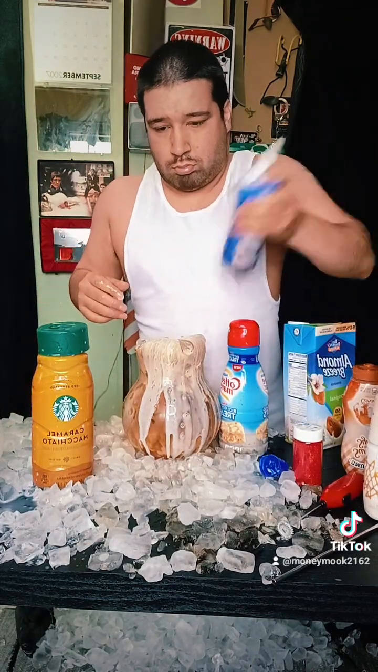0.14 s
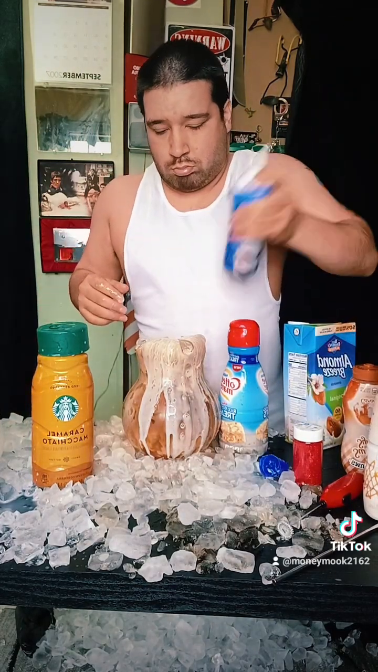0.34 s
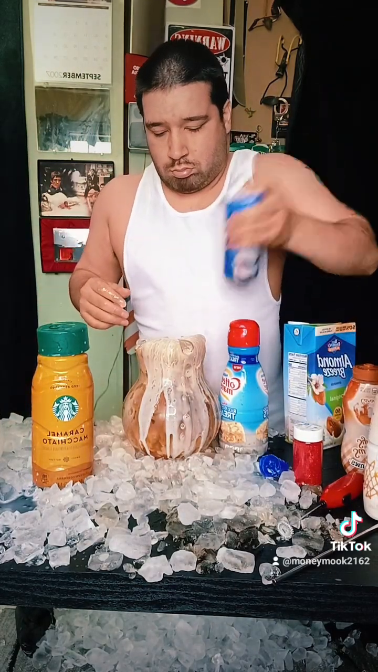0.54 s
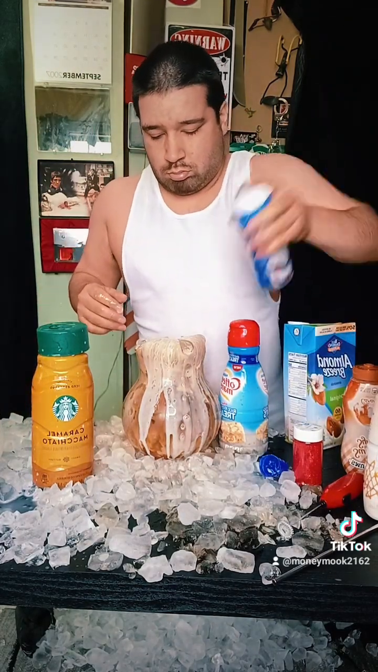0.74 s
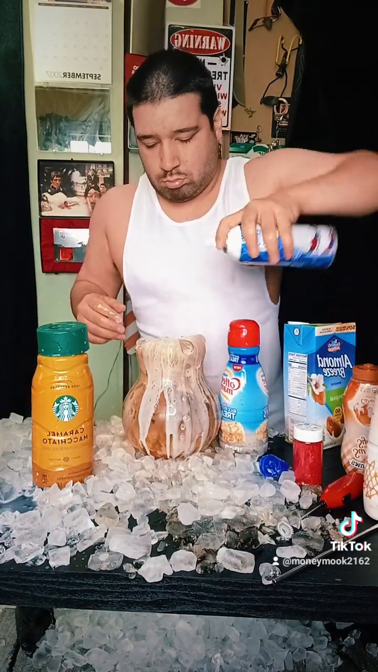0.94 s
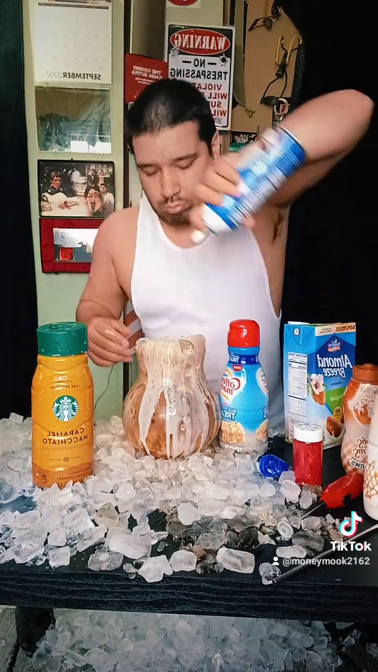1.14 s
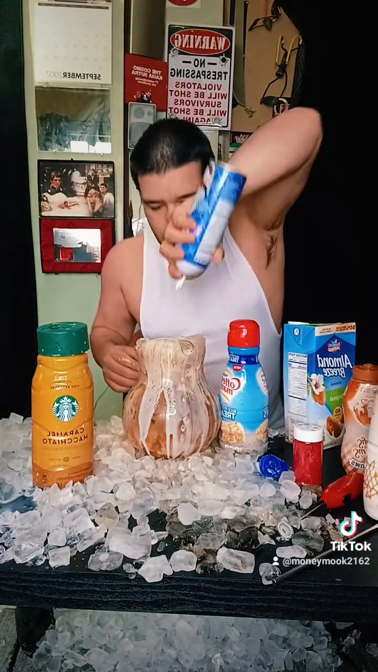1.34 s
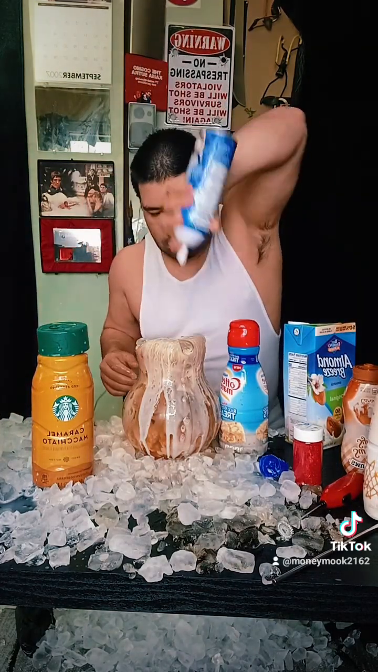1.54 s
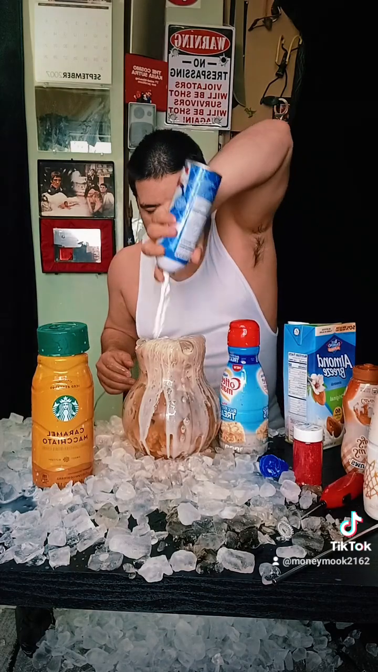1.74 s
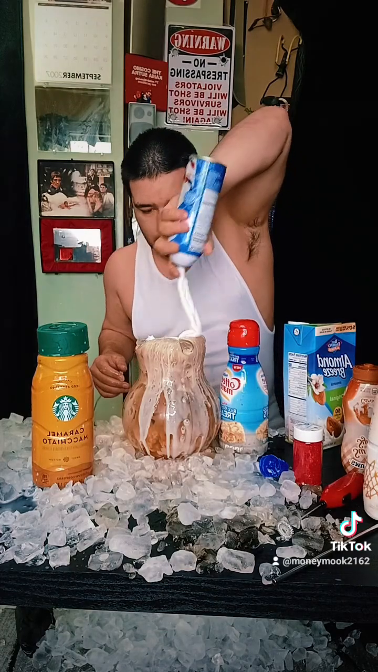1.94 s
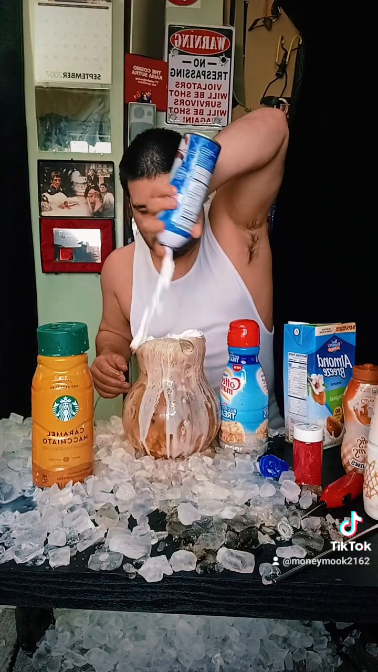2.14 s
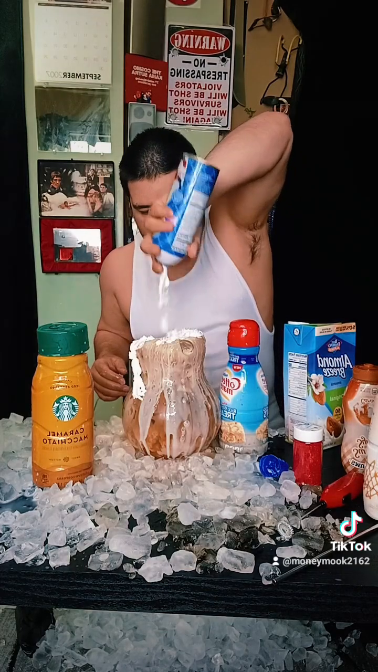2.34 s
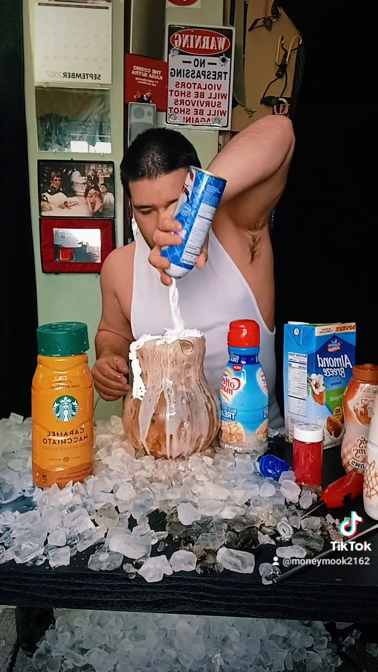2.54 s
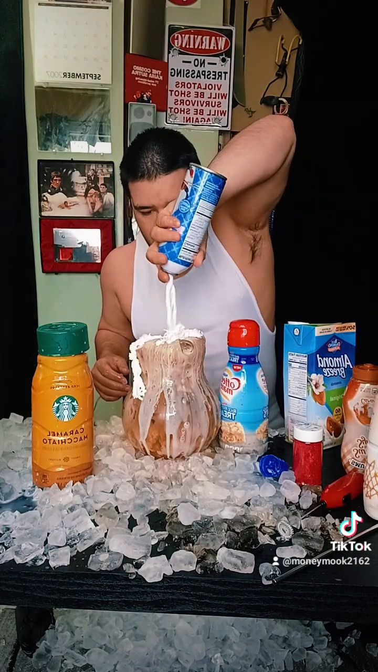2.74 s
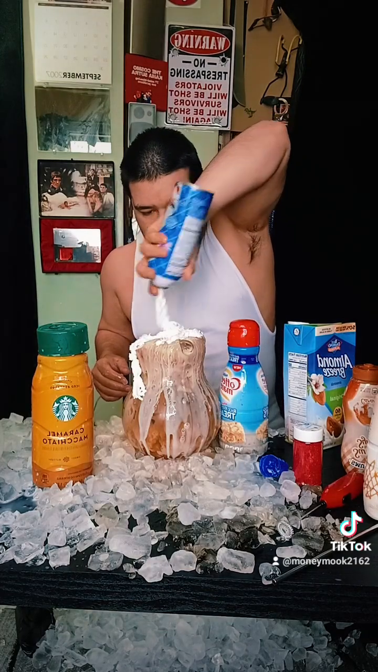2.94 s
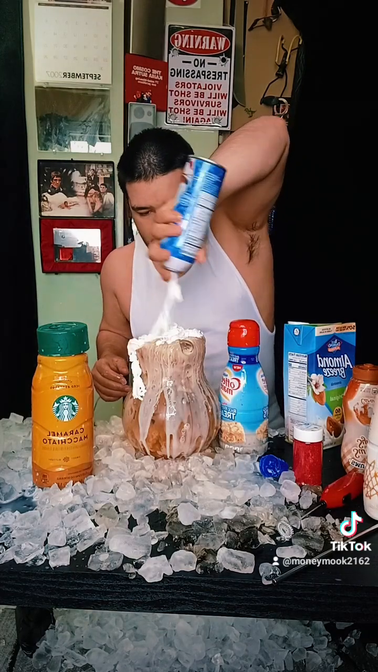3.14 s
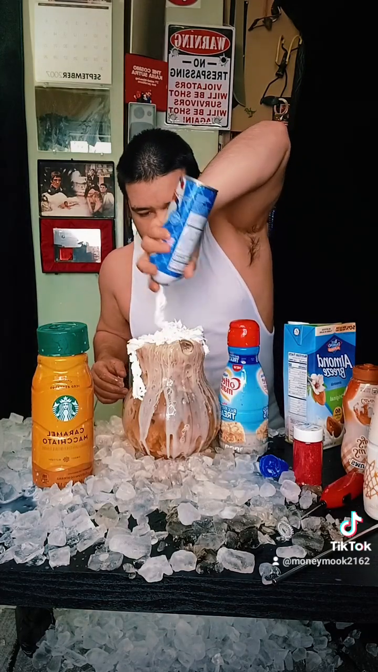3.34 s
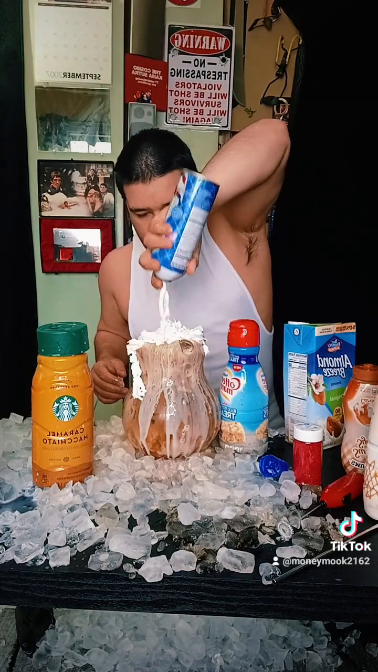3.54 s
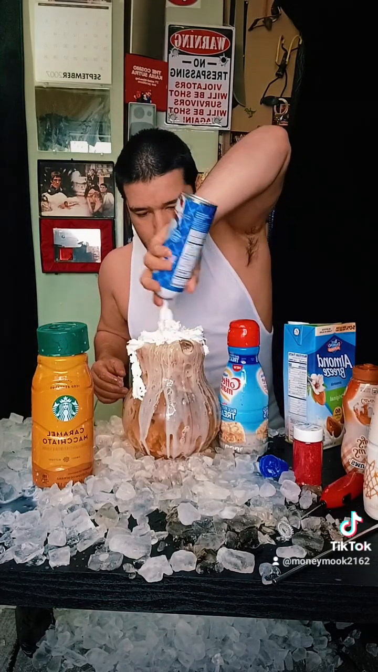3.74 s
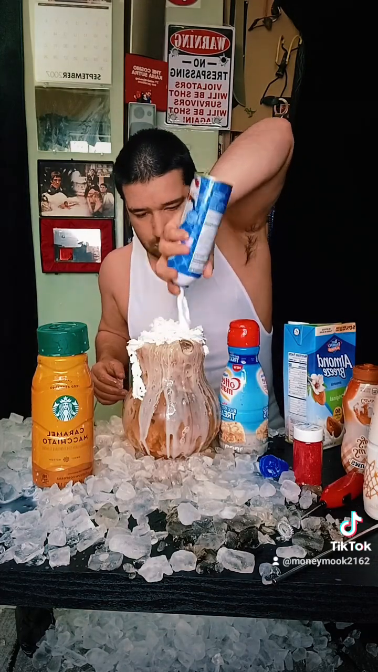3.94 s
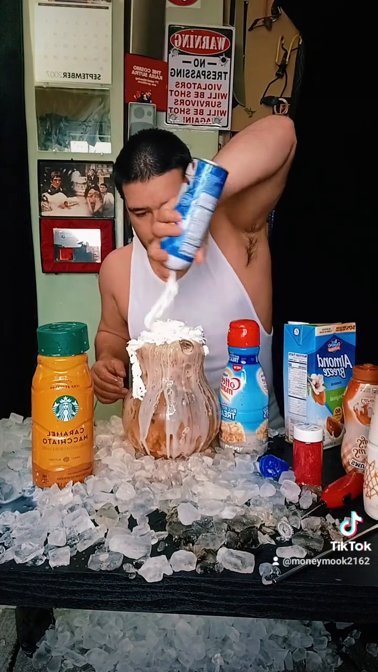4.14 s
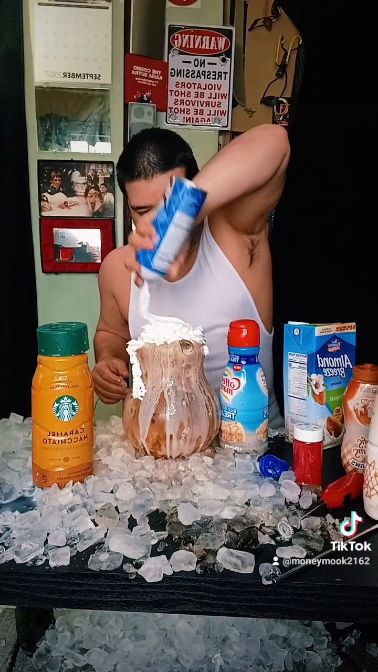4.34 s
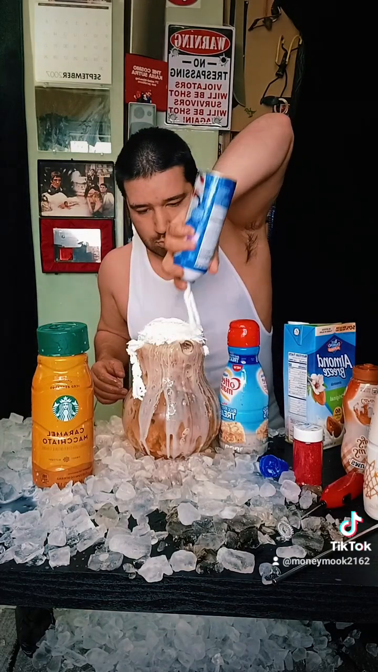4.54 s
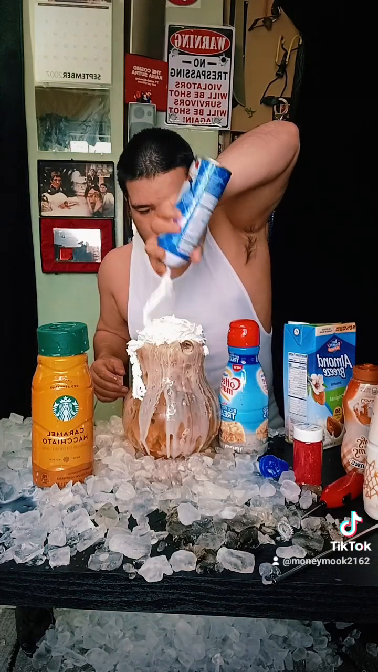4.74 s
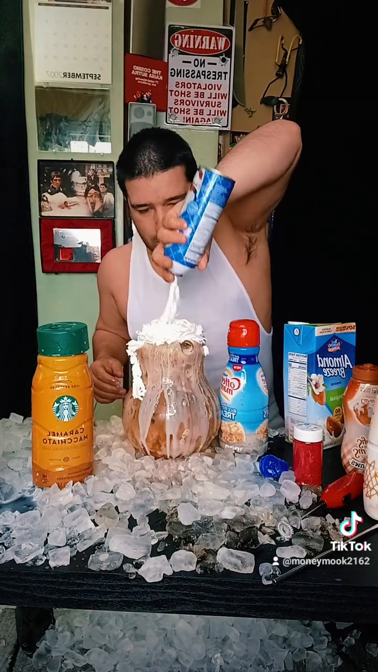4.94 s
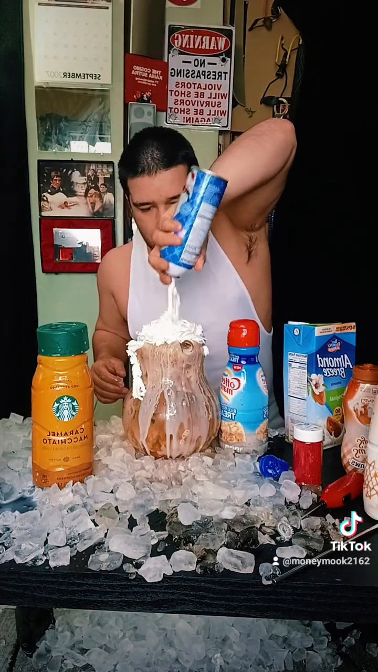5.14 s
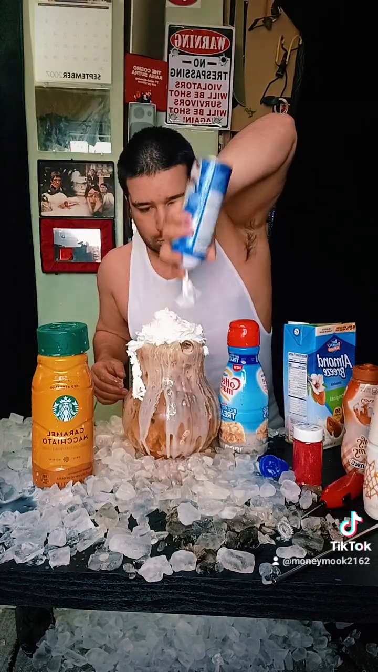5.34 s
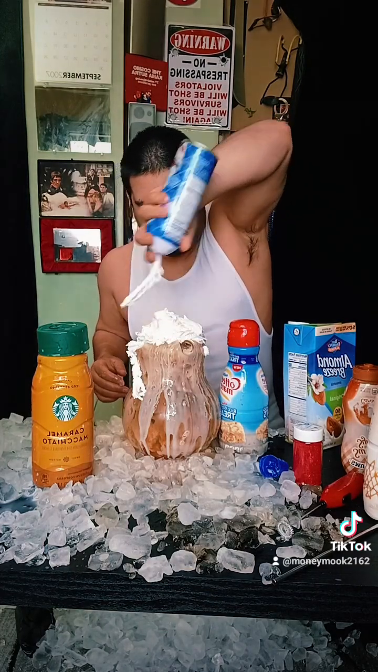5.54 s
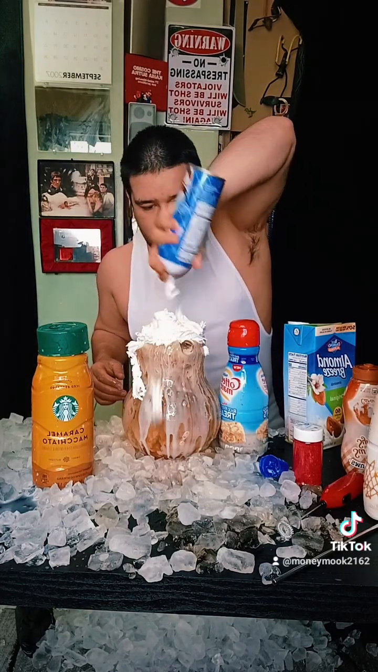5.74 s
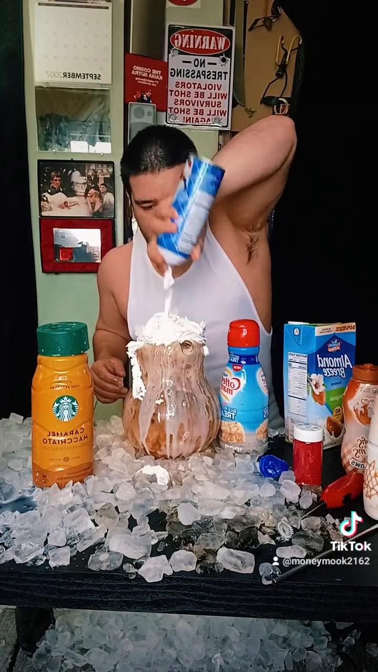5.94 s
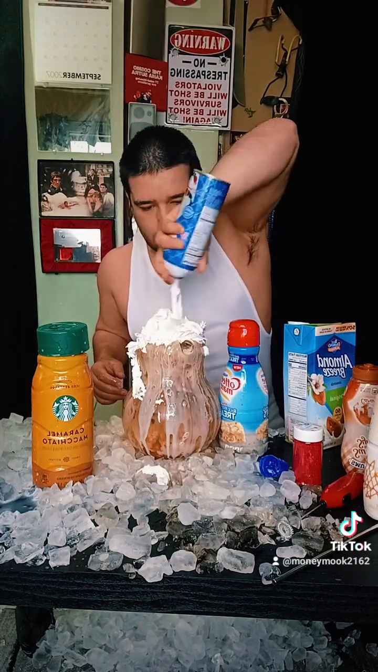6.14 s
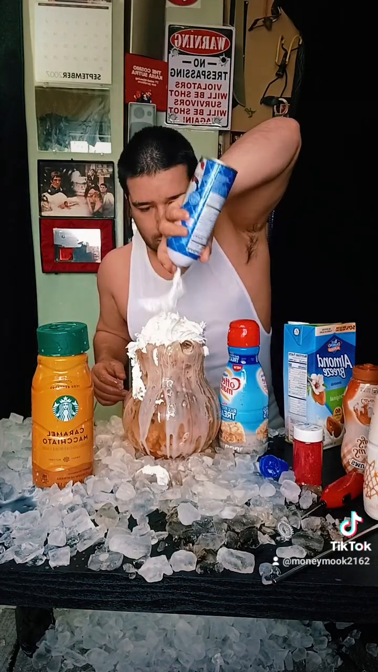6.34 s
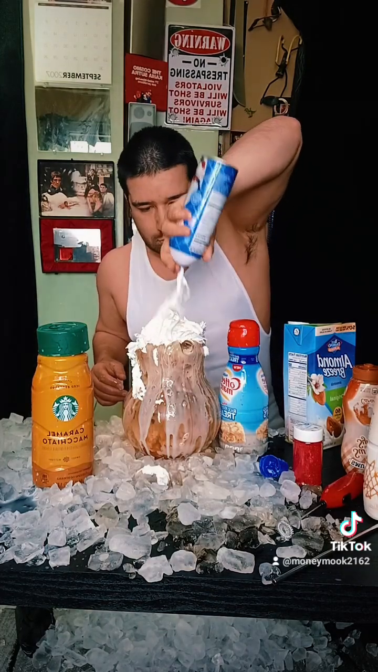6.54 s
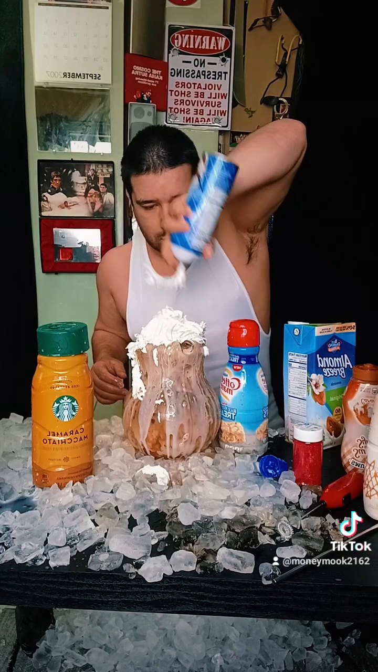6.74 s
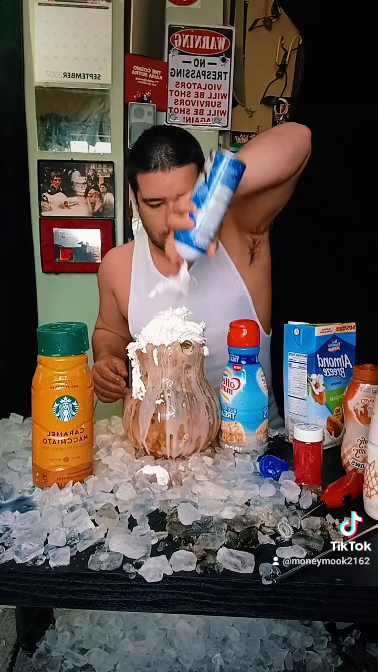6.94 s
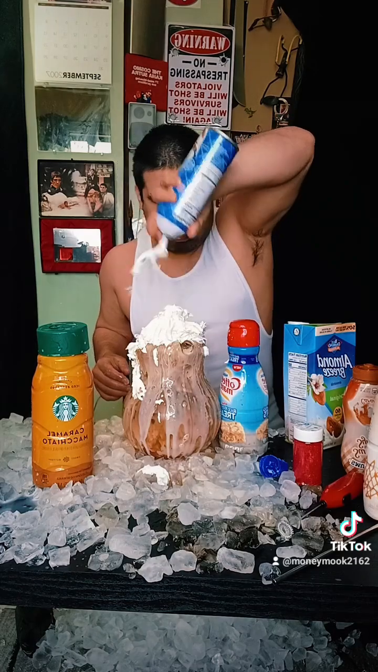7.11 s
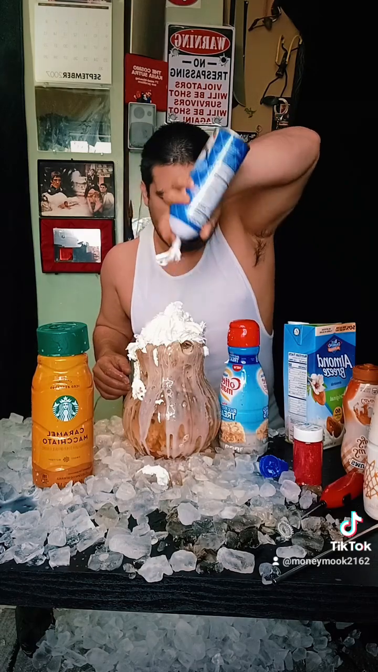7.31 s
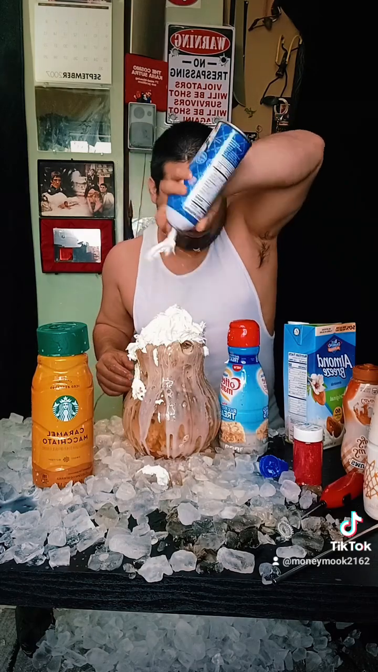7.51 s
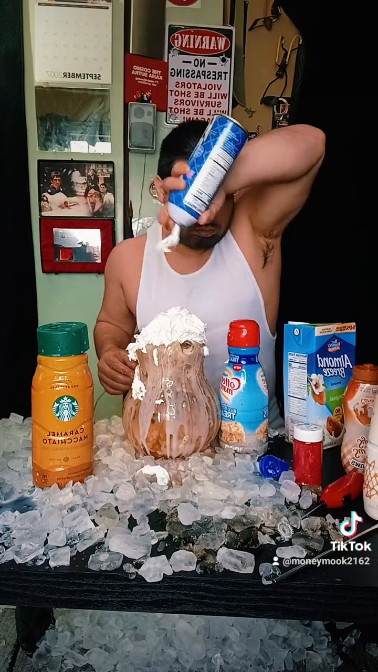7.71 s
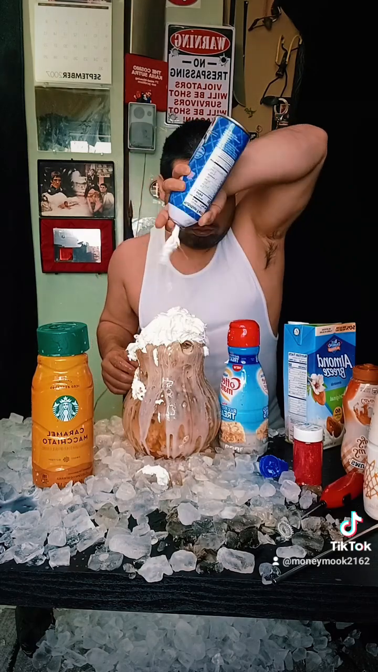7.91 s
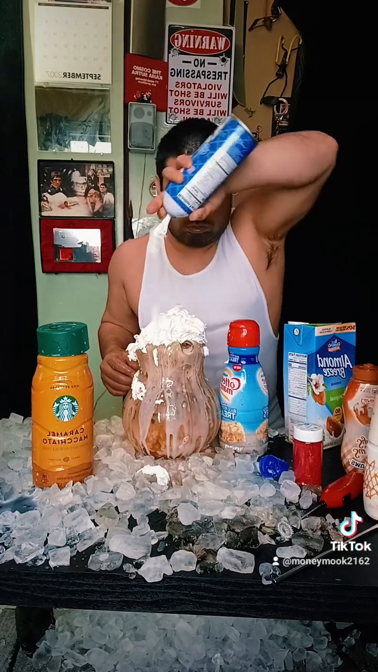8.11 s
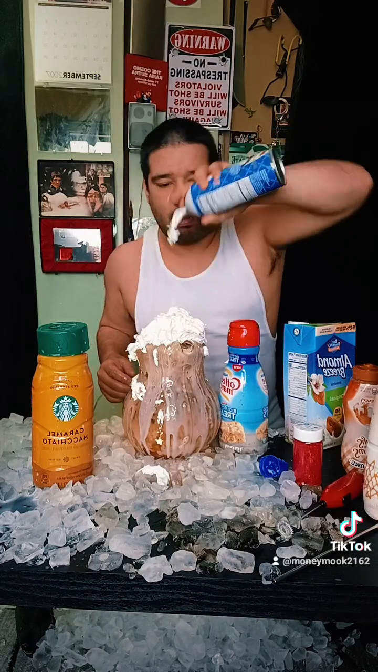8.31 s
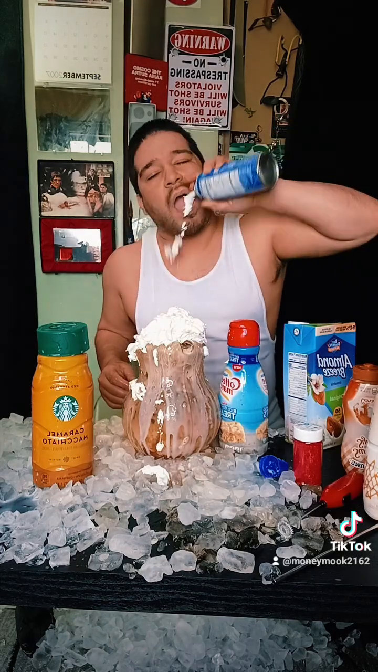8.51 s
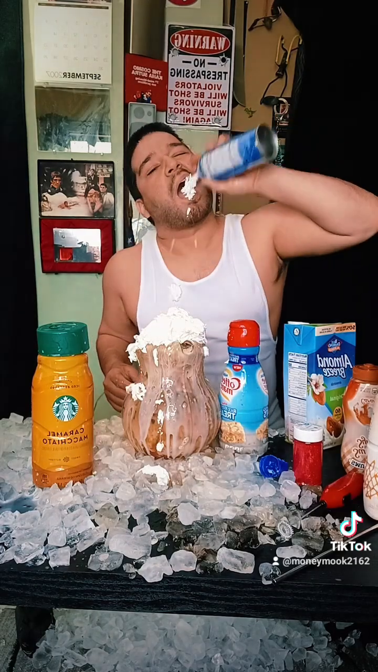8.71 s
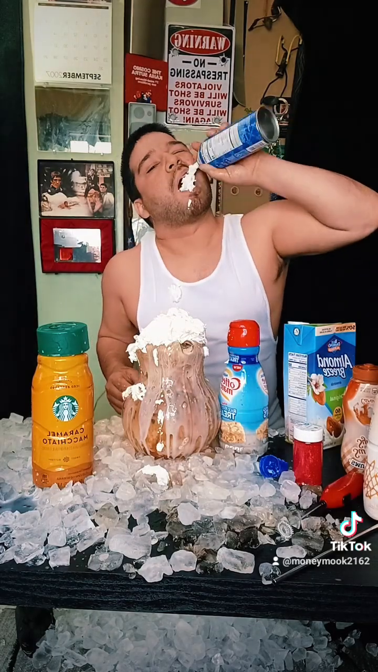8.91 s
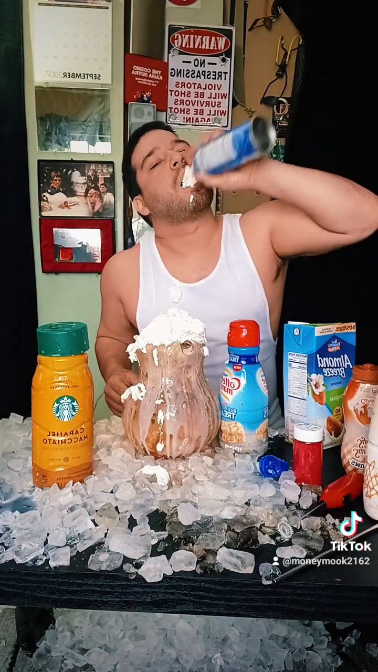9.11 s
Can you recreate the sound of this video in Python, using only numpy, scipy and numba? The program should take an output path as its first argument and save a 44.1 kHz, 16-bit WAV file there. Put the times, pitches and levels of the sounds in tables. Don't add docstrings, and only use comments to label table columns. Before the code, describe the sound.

Nearly quiet at first, with low room hum, cloth rustle and tiny knocks and finger ticks from a shaken spray can. A little gas seeps out with a few crisp clicks. After this the nozzle bursts open and hisses continuously onto a drink, harsh and wet, crackling with cream bubbles and short spits. It sags as the can empties, low rumbles beneath, then sounds cupped and sweeping as the nozzle moves before a hollow. Close microphone, small dry indoor space.

```python
import sys
import numpy as np
from scipy import signal
from scipy.fft import rfft, irfft, next_fast_len
from scipy.io import wavfile
from scipy.ndimage import uniform_filter1d
from numba import njit

SR = 44100
rng = np.random.default_rng(int(sys.argv[2]) if len(sys.argv) > 2 else 0)


def makeup_ratio(level_db):
    decades = np.asarray(level_db, float) / 20
    return 10 ** decades


def wav_record(signal):
    frames = np.transpose(np.atleast_2d(signal))
    bounded = np.clip(frames, -1, 1)
    quanta = np.round(bounded * 32767).astype(np.int16)
    wavfile.write(sys.argv[1], SR, quanta)


N = 408807
TIME_S = np.arange(N) / SR
SIZE = next_fast_len(N + 16384, True)
FREQ_HZ = np.maximum(np.arange(SIZE // 2 + 1) * SR / SIZE, 1)
OPEN_S = 1.72
ROOM_T60_S = 0.081

# (time [s], rumble level [dB], lift of the can's hollow ring [dB])
WAG = [(1.8, -74, -7), (2.03, -71, 3), (5.28, -65, -4), (5.37, -57, 6), (5.45, -65, -10), (6.14, -58, 0),
       (6.18, -53, -6), (6.37, -58, 3), (7.13, -50.5, -7.5), (7.32, -67, 9), (7.36, -54, -11),
       (7.44, -60, 8), (7.61, -53.5, -1), (7.65, -62, 6), (7.94, -56, 1), (8.79, -66, 4.5), (8.85, -62, -8),
       (9.25, -70, -6)]


def rms_one(x):
    return x / np.sqrt(np.mean(x ** 2) + 1e-20)


def in_time(rows):
    s, *columns = np.transpose(rows)
    return [np.interp(TIME_S, s, column) for column in columns]


def on_grid(points):
    hz, db = np.transpose(points)
    return np.interp(np.log(FREQ_HZ), np.log(hz), db)


def causal(db):
    cepstrum = irfft(db * np.log(10) / 20, SIZE)
    cepstrum[1:SIZE // 2] *= 2
    cepstrum[SIZE // 2 + 1:] = 0
    return rfft(cepstrum)


def split(spectrum, edges_hz):
    below = [0] + [1 / (1 + (FREQ_HZ / hz) ** 8) for hz in edges_hz] + [1]
    return [rms_one(irfft(spectrum * (b - a), SIZE)[:N]) for a, b in zip(below, below[1:])]


def noise_spectrum():
    return rfft(rng.standard_normal(N), SIZE)


def drift(rate):
    step = 40
    r = np.exp(-2 * step * np.pi * rate / SR)
    draws = rng.standard_normal(N // step + 2002)
    slow = signal.lfilter([1], [1, -2 * r, r * r], draws)[2000:]
    return np.interp(np.arange(N) / step, np.arange(len(slow)), rms_one(slow))


def swell(s, rise_s, fall_s):
    t = TIME_S - s
    return np.exp(-np.abs(t) / np.where(t < 0, max(rise_s, .002), max(fall_s, .002)))


def ring(clicks, hz, t60):
    r, w = makeup_ratio(-60 / (t60 * SR)), 2 * np.pi * hz / SR
    return signal.lfilter([0, np.sin(w)], [1, -2 * r * np.cos(w), r * r], clicks + 1e-18)


def puff(s, peak_db, hz, t60, octaves):
    t = np.arange(4000) / SR
    edges = np.clip([hz / 2 ** octaves, hz * 2 ** octaves], 50, [SR / 3, SR / 2.6])
    fade = makeup_ratio(-60 * t / max(t60, .002)) + makeup_ratio(-18 - 60 * t / ROOM_T60_S)
    noise = rng.standard_normal(len(t)) * fade
    noise[0] = 4
    burst = signal.sosfilt(signal.butter(2, edges, "band", fs=SR, output="sos"), noise)
    return round(s * SR), makeup_ratio(peak_db) * burst / np.abs(burst).max()


def place(bursts):
    out = np.zeros(N + 4000)
    for at, burst in bursts:
        out[at:at + len(burst)] += burst
    return out[:N]


@njit
def pole_zero(x, hz, depth, width_hz):
    y = np.zeros(len(x))
    p = np.exp(-np.pi * width_hz / SR)
    for i in range(2, len(x)):
        c = np.cos(2 * np.pi * hz[i] / SR)
        z = p + (1 - p) * depth[i]
        zeros = x[i] - 2 * z * c * x[i - 1] + z * z * x[i - 2]
        y[i] = zeros + 2 * p * c * y[i - 1] - p * p * y[i - 2]
    return y


def room_floor():
    # (frequency [Hz], density [dB per Hz])
    quiet_colour = [(18, -50), (35, -25.5), (55, -13), (100, -8), (200, -11.5), (500, -10), (1300, -15),
                    (3400, -25), (4400, -24), (7600, -24), (8400, -37), (11500, -30), (13200, -27),
                    (14500, -28), (15700, -25)]
    # (time [s], level [dB])
    arm = [
        (0, -1),
        (.45, -1),
        (.7, -1),
        (.88, -5.5),
        (1.1, -5),
        (1.35, 0),
        (1.7, -4),
    ]
    # (time [s], peak level [dB], rise [s], fall [s])
    swishes = [
        (1.14, -76, .02, 0.028),
        (1.42, -66, 0.044, 0.049),
    ]
    arm_db, = in_time(arm)
    hum, rustle, cloth = split(noise_spectrum() * makeup_ratio(on_grid(quiet_colour)), [280, 2500])
    floor = hum * makeup_ratio(-76.5 + 3 * swell(0, 1, .2))
    floor += rustle * makeup_ratio(-78 + arm_db + 2.0 * drift(25))
    floor += cloth * makeup_ratio(-78 + 1.3 * arm_db + 2.7 * drift(14))
    swish = split(noise_spectrum(), [1900, 4300])[1]
    floor += swish * sum(makeup_ratio(db) * swell(s, rise, fall) for s, db, rise, fall in swishes)
    boom = rms_one(ring(rng.standard_normal(N), hz=113, t60=0.13))
    return floor + makeup_ratio(-65) * swell(0, 1, 0.19) * boom


def shaken_can():
    # (time [s], peak level [dB], pitch [Hz], half width [octaves])
    tick_events = [(.014, -72, 5000, .6), (.072, -70, 5500, .5), (.34, -70, 14000, .15),
                   (0.1511, -65, 4960, .3), (0.3162, -64, 2790, 0.54), (0.382, -71, 6500, .2),
                   (0.4978, -74, 5730, .3), (0.5267, -57, 6800, 0.17), (0.5596, -55, 5700, 0.27),
                   (0.6335, -60, 5300, 0.26), (0.6584, -61, 5400, .3), (0.615, -68, 14200, .12),
                   (0.6823, -59, 14400, .12), (0.6823, -69, 10500, .3), (.7, -66, 14200, .1),
                   (.59, -66, 4900, .25), (0.5596, -68, 14000, .15), (0.634, -68, 14500, .15),
                   (0.634, -72, 10000, .1), (0.72, -67, 14200, .12), (0.7644, -69, 6440, .3),
                   (0.7844, -66, 14000, .2), (0.968, -42, 12700, 0.11), (1.1483, -59, 5250, .4),
                   (1.175, -37.5, 10500, 0.37), (1.2394, -58, 7030, 0.15), (1.2794, -54, 6690, .3),
                   (1.3064, -60, 4930, .3), (1.3932, -47, 7140, .2), (1.6272, -50, 12600, 0.36),
                   (1.6442, -50, 4800, 0.43), (1.32, -58, 14200, .12)]
    # (time [s], peak level [dB], pitch [Hz], t60 [s])
    knock_events = [(.105, -70, 1800, .15), (.125, -67, 600, .2), (.19, -77, 1100, .1),
                    (.295, -72, 1300, .05), (0.316, -58, 535, .08), (.318, -69, 1780, .25),
                    (.34, -67, 650, .15), (.41, -71, 1100, .2), (.525, -69, 800, .15), (.53, -73, 1750, .1),
                    (.61, -64, 358, .1), (.62, -65, 846, 0.16), (.716, -69, 1850, .3),
                    (.735, -69, 1880, .2), (.045, -72, 480, .15), (.135, -70, 950, .15),
                    (.435, -73, 1250, .12), (.715, -78, 700, .15), (.815, -76, 580, .1),
                    (.82, -77, 1350, .1), (.63, -74, 1200, .1), (.81, -70, 1000, .12)]
    ticks = place(puff(s, db, hz, 0.021, width) for s, db, hz, width in tick_events)
    width_hz = 110
    knocks = place(puff(s, db, hz, t60, .08 + width_hz / hz) for s, db, hz, t60 in knock_events)
    return ticks + knocks


def creeping_gas():
    # (frequency [Hz], density [dB per Hz])
    leak_colour = [(800, -26), (2200, -11), (3200, -5.5), (4300, -4.5), (5100, 2), (6300, -6), (7200, 4),
                   (8600, -14), (9500, -1), (11200, -11), (12000, 0), (13000, -1.5), (14000, -1),
                   (15700, 1)]
    # (time [s], peak level [dB], rise [s], fall [s])
    creeps = [
        (.962, -64.5, 0.024, 0.029),
        (1.15, -58.5, 0.043, 0.012),
        (1.18, -61.5, .01, 0.4),
        (1.39, -66, 0.044, 0.32),
        (1.646, -80, 0.0073, 0.012),
        (1.71, -91, 0.018, 0.046),
    ]
    leak = rms_one(irfft(noise_spectrum() * makeup_ratio(on_grid(leak_colour)), SIZE)[:N])
    creep = sum(makeup_ratio(db) * swell(s, rise, fall) for s, db, rise, fall in creeps)
    return creep * leak * makeup_ratio(1.5 * drift(40))


def valve():
    return np.clip((TIME_S - OPEN_S) / 0.015, 0, 1)


def slosh():
    # (frequency [Hz], density [dB per Hz])
    slosh_colour = [(18, -60), (36, -36), (60, -9), (100, -1), (140, 0), (181, -5.5), (228, 5), (268, -3),
                    (320, -11), (420, -32), (700, -120)]
    wag_db, ring_db = in_time(WAG)
    rumble, hollow = split(noise_spectrum() * makeup_ratio(on_grid(slosh_colour)), [180])
    return valve() * makeup_ratio(wag_db + 1.2 * drift(9.7)) * (rumble + makeup_ratio(ring_db + 1.5) * hollow)


def opening(full_s):
    return np.minimum(0, (TIME_S - full_s) * 1000)


def flow_levels(near):
    # (time [s], level [dB])
    flow = [(1.8, -33.5), (2.15, -33), (2.7, -33), (3.9, -34), (4.4, -35), (5.6, -35), (6.3, -35.5),
            (6.45, -36), (7.0, -35.5), (7.7, -37), (8.2, -36), (8.6, -36), (8.85, -36.5), (9.27, -38.5)]
    # (time [s], treble lift [dB])
    surges = [(2.22, 3), (2.36, 2), (3.75, -4.5), (3.79, 7.5), (3.84, -2.5), (4.07, 2), (4.32, 0),
              (4.37, 3), (4.6, 2), (4.7, 0), (4.79, 0), (4.86, 0.5), (5.08, 2.5), (5.67, 0.5), (6.22, 4),
              (8.008, -0.5), (8.09, 1), (8.57, 4), (8.87, 3.5), (9.06, 1), (9.21, 2.5)]
    # (time [s], lift [dB])
    pockets = [(3.672, 0.5), (4.43, -3), (4.47, 4.5), (4.68, -1), (5.29, 1.5), (5.52, 1.5), (5.63, -2),
               (6.34, 3), (6.64, 1.5), (6.72, -0.5), (8.34, -2), (8.41, 2.5), (8.53, -8.5), (8.55, 6.5)]
    flow_db, = in_time(flow)
    pockets_db = sum(db * swell(s, 0.031, 0.031) for s, db in pockets)
    surges_db = sum(db * swell(s, 0.039, 0.032) for s, db in surges)
    lower_full_s, treble_full_s = 1.76, 1.753
    packing_db = -8 * swell(lower_full_s, 1, 0.065)
    nozzle_db = flow_db + pockets_db + opening(lower_full_s) + packing_db
    body_db = 2 - 2 * near - pockets_db + 0.2 * drift(2.2)
    treble_db = -34.5 + 0.99 * (flow_db + 35) + near + surges_db + opening(treble_full_s)
    return nozzle_db, body_db, treble_db


def turbulence(per_s, spread_db, cycles, pops_db):
    bursting = rng.random(N) < per_s * makeup_ratio(1.4 * drift(25)) / SR
    sizes = makeup_ratio(spread_db * np.minimum(rng.exponential(1, N), 2.9)) * bursting
    pitches = np.geomspace(900, 14000, 12)
    dealt = rng.integers(0, 12, N)
    pops = sum(ring(sizes * (dealt == k), hz, cycles / hz) * hz for k, hz in enumerate(pitches))
    return rng.standard_normal(N) + makeup_ratio(pops_db) * rms_one(pops)


def nozzle_tube(gas, near):
    # (time [s], frequency [Hz])
    tube = [(1.78, 4050), (1.95, 3200), (2.03, 3450), (2.1, 4050), (2.18, 3400), (2.28, 3200), (2.4, 3780),
            (2.5, 3400), (2.65, 3650), (3.0, 3700), (3.2, 3300), (3.47, 3500), (3.62, 3250), (3.85, 3800),
            (4.3, 3400), (4.72, 3750), (5.0, 3500), (8.5, 3550)]
    # (time [s], added strength, length
    # [s])
    clearings = [(1.767, 2.9, 0.035), (2.02, 0.56, 0.044), (2.1, 1.2, 0.03), (2.164, 0.23, 0.035),
                 (2.33, 1.4, 0.029), (2.397, 1.2, 0.026), (2.517, -.5, 0.036), (2.65, 1.6, 0.074),
                 (2.794, 1, 0.07), (3.0, 0.32, 0.061), (3.3, 0.13, 0.06), (3.48, 1.2, 0.052),
                 (3.8, 0.39, .08), (4.05, 0.37, 0.1), (4.728, 0.81, 0.061), (5.098, 0.7, 0.092),
                 (5.3, 0.88, 0.035), (5.6, 0.21, .06), (5.8, .5, .06), (6.9, -0.35, .4), (8.343, .4, 0.1)]
    tube_hz = in_time(tube)[0] + 50 * drift(10.0)
    strength = 1 + sum(k * swell(s, length, length) for s, k, length in clearings)
    ringing = np.clip(strength, 0, 3) * (1 - near) * 1.3 * makeup_ratio(1.5 * drift(9.9))
    gas = pole_zero(gas, tube_hz, -ringing, 430.0)
    null = np.clip(0.068 + 0.17 * drift(12.0), 0, .9) * (1 - near)
    return pole_zero(gas, tube_hz + 650, null, 370.0)


def valve_gurgle(gas):
    # (time [s], lift of the low ring, lift of the upper ring, lift of the lowest ring)
    gurgles = [(1.87, 0.37, 0.35, 0.24), (2.05, 0.18, 0.15, -0.24), (2.2, 0.13, 0.035, -0.14),
               (2.58, -0.14, 0.26, -0.18), (7.3, -0.14, -0.045, -0.056), (7.62, -0.085, 0.059, 0),
               (8.47, -.4, -.1, -0.34), (2.3, -0.25, -0.1, -.1), (2.45, .3, -0.17, 0.086),
               (2.7, 0.47, .4, 0.22), (2.95, 0.014, 0.097, 0.014), (3.12, 0.053, -.1, 0.17),
               (3.27, -0.084, 0.068, -0.025), (3.42, 0.26, 0.22, .1), (3.6, -0.042, 0.34, 0.27),
               (3.9, .2, .1, -0.21), (4.17, 0.69, 0.21, .1), (4.42, 0.24, -.1, 0.58),
               (4.62, -0.073, 0.41, 0.28), (4.8, -0.33, 0.4, 0.32), (5.05, 0.056, 0.025, 0.051),
               (5.35, 0.58, 0.42, 0.12), (5.6, 0.29, .2, 0.56), (5.72, -.2, 0.17, -0.36),
               (5.85, 0.39, .2, 0.6), (6.15, .4, .1, -0.014), (6.3, 0.22, .2, .2),
               (6.43, -0.2, -0.67, -0.23), (6.8, 0.67, 0.0097, .2), (7.0, -0.34, -0.041, 0.38),
               (7.15, 0.3, -0.072, -0.15), (7.5, .3, 0.043, 0.38), (7.75, 0.31, -.1, 0.27),
               (8.05, -0.31, -0.15, -0.42), (8.25, 0.062, 0.43, -0.3)]
    low, upper, lowest = sum(np.outer(lifts, swell(s, 0.059, 0.059)) for s, *lifts in gurgles)
    low_loss = 0.45 * swell(2.3, 1, 0.18) + 0.01 - low
    upper_loss = 0.47 * swell(7.9, 1.1, 2.3) - 0.2 - upper
    gas = pole_zero(gas, np.full(N, 750.), -lowest, 200.0)
    for hz, width_hz, loss in [(1200.0, 210.0, low_loss), (2550.0, 290.0, upper_loss)]:
        gas = pole_zero(gas, hz + 30 * drift(4.5), loss + 0.058 * drift(6.0), width_hz)
    return gas


def room(gas):
    # (delay [ms], level [dB])
    echo_list = [
        (.88, -57),
        (2.68, -17),
        (5.15, -24),
        (6.05, -11),
    ]
    echoes = 1 + sum(makeup_ratio(db) * np.exp(-2j * np.pi * FREQ_HZ * ms / 1000) for ms, db in echo_list)
    t = np.arange(12000) / SR
    far = rfft(rng.standard_normal(len(t)) * makeup_ratio(-60 * t / ROOM_T60_S) * (t > .007), SIZE)
    far = far / np.sqrt(uniform_filter1d(np.abs(far) ** 2, size=500))
    far = makeup_ratio(-2) * far / (1 - 1j * 2470 / FREQ_HZ) ** 2
    lag = np.round(.6 / 1000 * SR * drift(2.5)).astype(int)
    moved = rfft(gas[np.clip(np.arange(N) - lag, 0, N - 1)], SIZE)
    return rfft(gas, SIZE) * echoes + moved * far


def spray_bands(gas, near):
    # (frequency [Hz], density [dB per Hz])
    jet_colour = [(120, -44), (200, -10), (400, 3), (655, -5), (950, -5), (1800, -6.5), (2500, -1.5),
                  (3000, -10.5), (4500, -5.5), (7000, -2), (10500, -5.5), (12500, 1), (14000, -5),
                  (15700, -3.5)]
    # (frequency [Hz], density [dB per Hz])
    hollow_colour = [(120, -28.5), (260, -12.5), (480, 0.5), (1000, 2), (1500, 0), (2000, 4.5), (2500, 1.5),
                     (3000, -2.5), (3800, -2), (5000, -3.5), (5800, -5.5), (7000, -7), (12800, -6),
                     (15700, -9.5)]
    # (frequency [Hz], width [Hz], lift [dB])
    corner = [(300, 18, -6), (422, 120, 2.5), (497, 29, -27.5), (552.5, 29, 11.5), (653.7, 64, 11.5),
              (793, 46, 11), (845, 31, -15), (917, 32, 14), (970, 36, -16), (990, 16, 8), (976, 86, -5.5),
              (1082, 20, 19), (1108, 27, -14.5), (1172.5, 55, 14.5), (1266, 33, 10), (1350, 43, 14.5),
              (1565, 43, -36), (1603, 21, 26), (1750, 39, 23.5), (1800, 68, -30), (1800, 30, -5),
              (2066, 37, 15.5), (2360, 96, 3.5), (2560, 35, 2.5), (2760, 68, 8), (3020, 56, -11),
              (3190, 43, 13), (3220, 37, 0), (3280, 160, -8.5), (3540, 15, -23)]
    nozzle_db, body_db, treble_db = flow_levels(near)
    corner_db = sum(db / (1 + (2 * (FREQ_HZ - hz) / width) ** 2) for hz, width, db in corner)
    flutter = .25 * drift(19) + .45 * drift(70)
    open_db = on_grid(jet_colour) + corner_db
    out = np.zeros(N)
    for colour_db, share in [(open_db, 1 - near), (on_grid(hollow_colour), near)]:
        body, nozzle, treble = split(gas * np.exp(causal(colour_db)), [2000, 4500])
        sway = .5 / 1000 * SR * drift(2.0)
        body = np.interp(np.arange(N) - sway, np.arange(N), body)
        lower = body * makeup_ratio(body_db + 0.26 * flutter) + nozzle * makeup_ratio(0.36 * flutter)
        treble_flutter = 1.5 * flutter + .5 * drift(35) + .6 * drift(5)
        out += share * (lower * makeup_ratio(nozzle_db) + treble * makeup_ratio(treble_db + treble_flutter))
    return out


def sputtering():
    # (time [s], peak level [dB], pitch [Hz])
    sputters = [(1.7666, -20, 3820), (1.874, -27, 2460), (1.969, -19, 5800), (2.0805, -21, 4000),
                (2.522, -21, 2090), (2.6514, -19, 2560), (2.7042, -22, 2290), (2.7805, -27, 3620),
                (2.802, -21, 2540), (2.8334, -28, 2280), (2.895, -20, 2400), (2.9965, -18, 2610),
                (3.1108, -30, 2770), (3.1643, -22, 2370), (3.403, -19, 2830), (3.4385, -15, 2550),
                (3.5632, -22, 2550), (3.656, -16, 2470), (3.7805, -20, 2520), (3.8005, -17, 2480),
                (3.8727, -14, 2540), (3.9144, -18, 2480), (3.9583, -15, 3950), (3.9878, -19, 2360),
                (4.067, -21, 2560), (4.1155, -18, 2520), (4.1634, -24, 2380), (4.227, -29, 2570),
                (4.318, -17, 3490), (4.3533, -16.5, 3540), (4.6493, -24, 2480), (4.6737, -27, 3520),
                (4.7017, -18, 2620), (4.783, -17, 2360), (4.8343, -18, 2760), (4.8923, -21, 2560),
                (5.2015, -26, 2640), (5.223, -24, 2550), (5.2495, -20, 2510), (5.3641, -19, 2370),
                (5.559, -14, 2680), (5.7024, -21, 2510), (5.7548, -18, 3200), (6.5689, -27, 2040),
                (6.8253, -16, 2060), (6.84, -29, 300), (7.2244, -19, 4240), (8.001, -22, 2430),
                (8.0316, -36, 2730), (8.0807, -33, 2390), (8.3578, -22, 7200), (8.4741, -25, 6000),
                (8.5544, -22, 2430), (8.6516, -17, 2980), (8.825, -21, 2040), (8.8542, -22, 2330),
                (8.8896, -22, 3390), (8.929, -17, 2880), (8.9822, -20, 3190), (9.17, -18, 2500)]
    return place(puff(s, db - 1, hz * 1.28, 0.0034, 0.51) for s, db, hz in sputters)


def before_hollow(out, notch_hz, near):
    out = pole_zero(out, notch_hz, near, 280.0)
    low_ring = np.clip((TIME_S - 8.62) / .1, 0, 1) * (0.61 + .9 * swell(9.02, 0.053, 0.073))
    out = pole_zero(out, notch_hz - 190, -near ** 3 * low_ring, 140.0)
    second_hz = 1620 + .33 * notch_hz + 90 * drift(9.0)
    out = pole_zero(out, second_hz, -near ** 3 * (.6 + 2.0 * swell(8.86, .05, .1)), 560.)
    out = pole_zero(out, notch_hz + 855, 0.82 * swell(8.55, 0.089, 0.058), 350.)
    out = pole_zero(out, np.full(N, 3850.), .65 * near ** 2, 600.)
    out = pole_zero(out, np.full(N, 2460.), .5 * near ** 4, 230.0)
    out = pole_zero(out, np.full(N, 655.), 0.75 * near ** 4, 90.)
    for mode_hz in (2980., 5050.):
        out = pole_zero(out, mode_hz + 60 * drift(4.4), -.8 * near ** 2, 290.0)
    return out


def jet():
    # (time [s], notch [Hz], nearness [0-1])
    hollow_path = [(2.0, 263, 0.44), (3.6, 300, 0.37), (4.6, 375, 0.39), (8.3, 384, 0.45),
                   (8.42, 430, 0.46), (8.5, 560, 0.7), (8.57, 760, 0.52), (8.63, 1040, 1),
                   (8.7, 1310, 0.92), (8.87, 1330, 0.81), (8.95, 1230, 0.78), (9.05, 1160, 0.98),
                   (9.15, 1060, 0.86), (9.27, 870, 0.8)]
    notch_hz, near = in_time(hollow_path)
    near = np.clip(near, 0, 1)
    gas = turbulence(per_s=1500, spread_db=3.5, cycles=6.0, pops_db=0.0)
    gas = valve_gurgle(nozzle_tube(gas, near))
    spray = spray_bands(room(gas), near) + sputtering()
    return valve() * before_hollow(spray, notch_hz, near)


def scene():
    # (frequency [Hz], side minus mid [dB])
    side_colour = [(30, -12), (100, -25), (300, -26), (850, -29), (950, -72), (4300, -70), (4600, -11),
                   (9800, -15), (10300, -66), (13500, -64), (13900, -13), (15700, -19.5)]
    # (start [s], end [s], level [dB])
    partings = [
        (0, 1.1, 1),
        (1.698, 1.76, -10),
        (4.84, 4.87, 9),
        (8.042, 8.074, 7),
    ]
    mid = room_floor() + shaken_can() + creeping_gas() + slosh() + jet()
    knots_hz = np.arange(0, SR / 2, 40)
    scramble = np.exp(2j * np.pi * np.interp(FREQ_HZ, knots_hz, rng.random(len(knots_hz))))
    apart = rfft(mid, SIZE) * makeup_ratio(on_grid(side_colour)) * scramble
    bass, treble = FREQ_HZ < 300, (FREQ_HZ > 2000) & (FREQ_HZ < 12000)
    patches = (TIME_S < OPEN_S) | (in_time(WAG)[0] + 7 * drift(8) > -53)
    spells = sum(makeup_ratio(db) * (TIME_S > start) * (TIME_S < end) for start, end, db in partings)
    side = irfft(apart * ~(bass | treble), SIZE)[:N]
    for band, gate in [(bass, patches), (treble, spells)]:
        side += irfft(apart * band, SIZE)[:N] * uniform_filter1d(gate * 1., size=600)
    return np.array([mid + side, mid - side])


def band_limit(x):
    return signal.sosfilt(signal.butter(12, 17040, fs=SR, output="sos"), x)


def record(dry):
    rounded = .3 * np.tanh(dry / .3)
    mix = signal.sosfilt(signal.ellip(14, .3, 90, 15700, fs=SR, output="sos"), rounded)
    return band_limit(mix)


dry = scene()
out = record(dry)
wav_record(out)
```